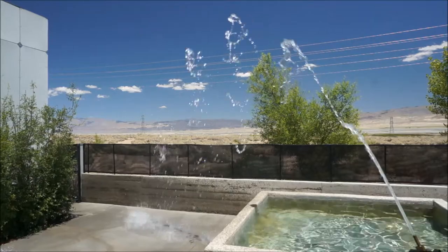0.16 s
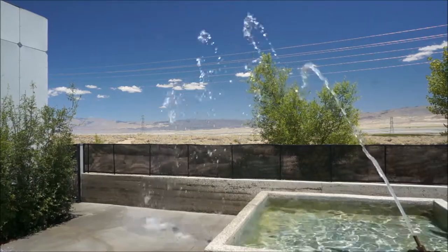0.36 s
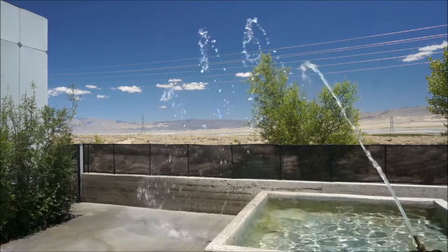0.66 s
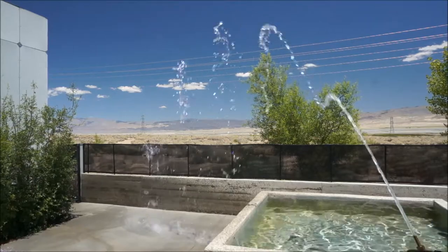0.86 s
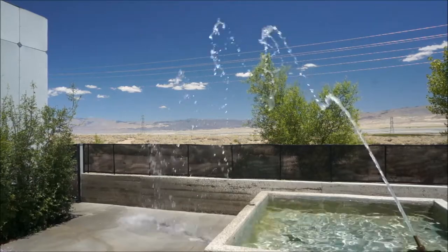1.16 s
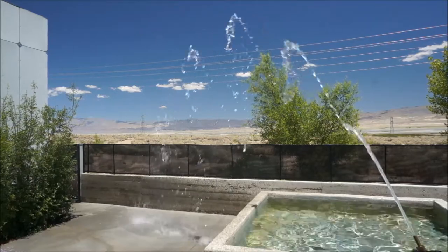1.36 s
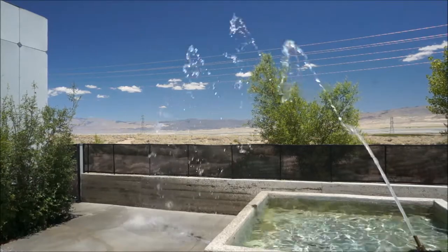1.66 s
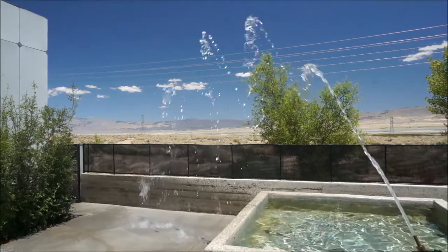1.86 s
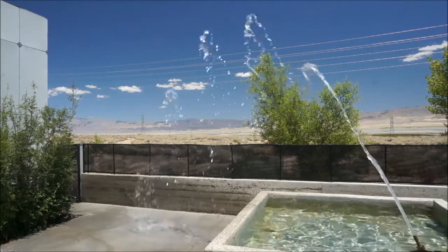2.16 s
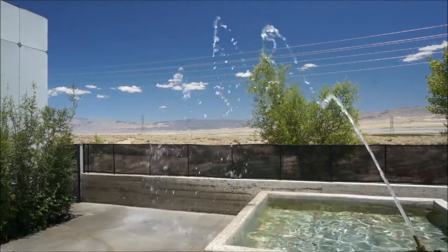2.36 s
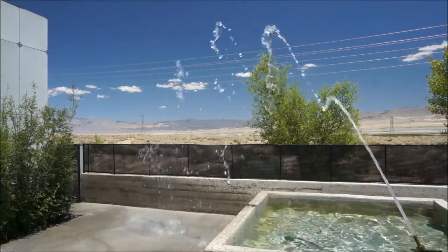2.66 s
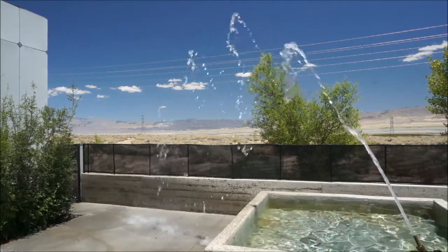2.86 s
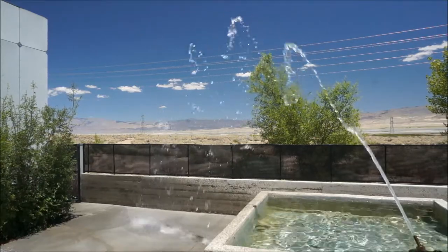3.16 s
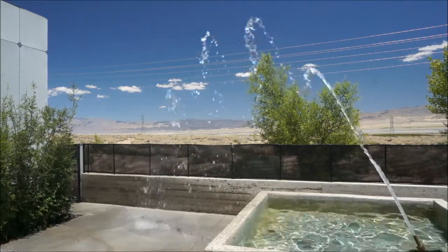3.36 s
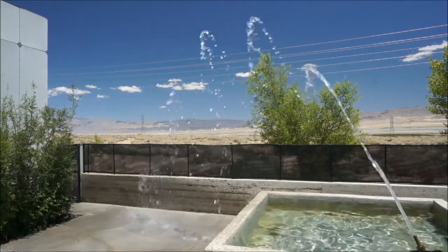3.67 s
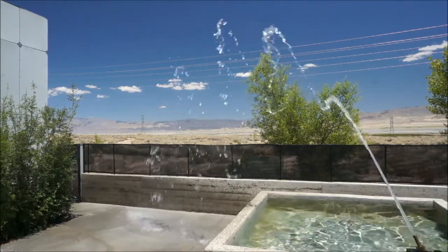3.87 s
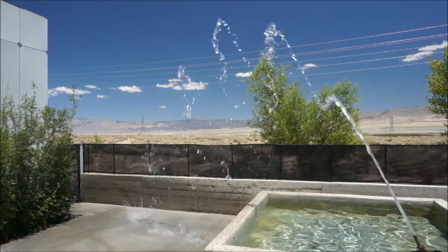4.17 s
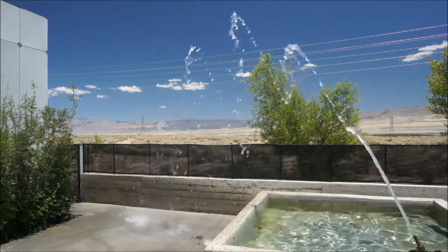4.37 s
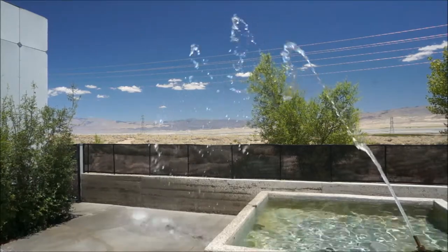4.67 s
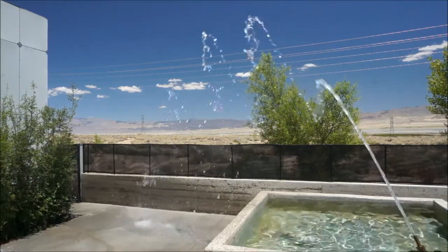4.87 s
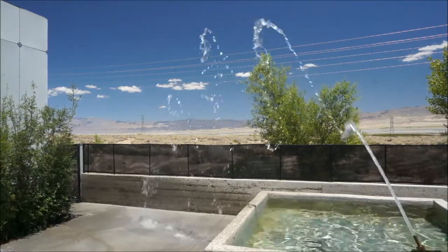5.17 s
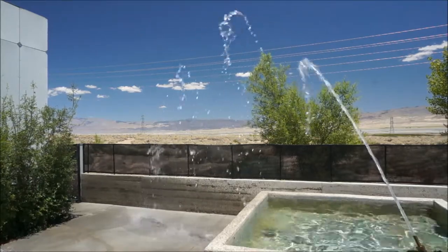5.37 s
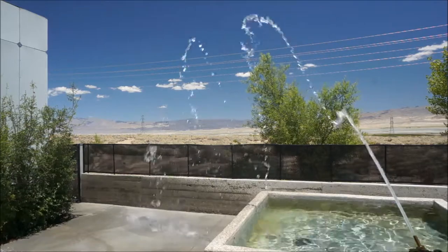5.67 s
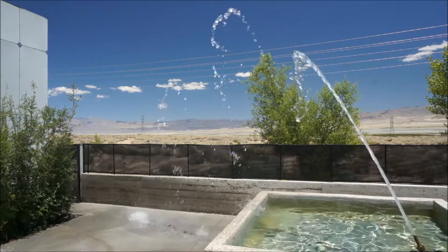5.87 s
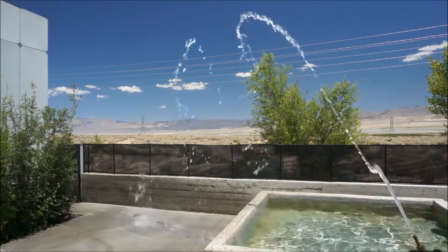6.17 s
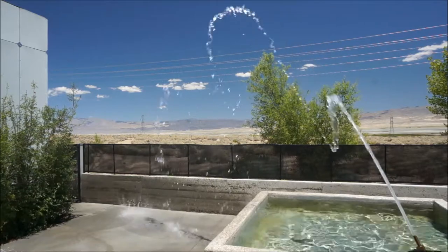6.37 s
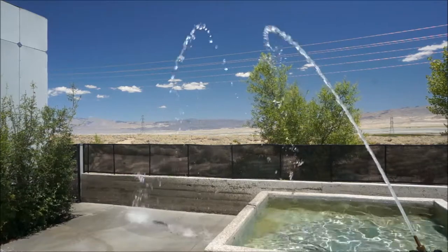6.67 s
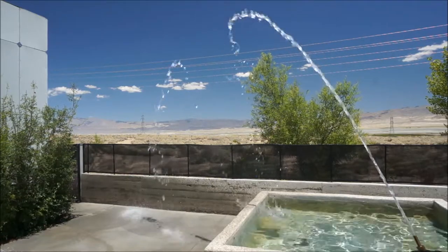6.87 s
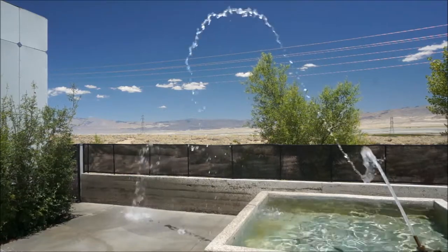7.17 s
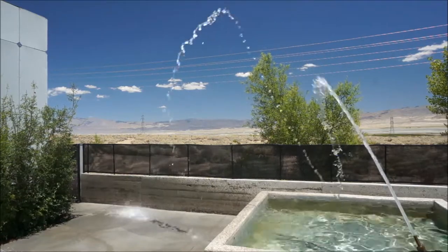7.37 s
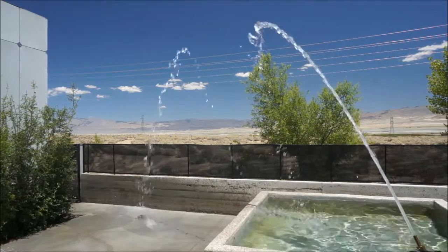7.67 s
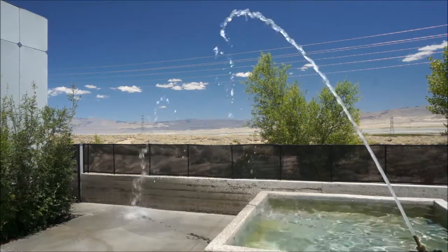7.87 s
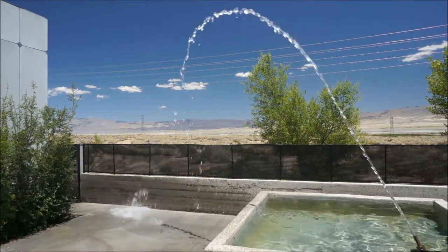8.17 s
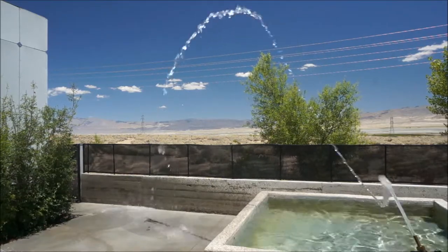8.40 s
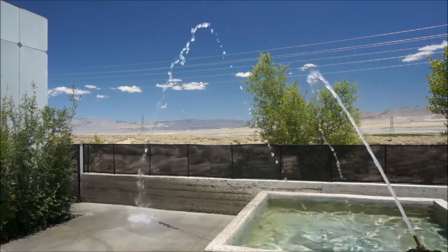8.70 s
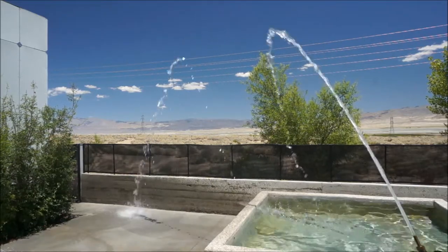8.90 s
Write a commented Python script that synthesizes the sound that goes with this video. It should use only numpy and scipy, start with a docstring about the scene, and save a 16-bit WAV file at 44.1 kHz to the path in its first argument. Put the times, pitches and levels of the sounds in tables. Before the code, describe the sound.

Water splatters on hard concrete in a steady, uneven rhythm: heavy gobs slap, drops patter sharply, fine spray hisses, and occasional bubbles plop in a pool. The pulses start short and frequent, then stretch into longer bursts separated by sparse dripping. Close, wide stereo in an open yard, the left side a little louder, with a brief noisy scatter from deck and wall and barely audible low wind.

```python
"""Fountain jets break up in the air and rain onto a wet concrete deck and a small pool, outdoors.
The water lands in uneven spurts over a drizzle: heavy gobs slap, drops patter, fine spray fizzes.
Slugs burst into clicks on concrete and ring bubbles in the pool; longer pours drum low and dull.
Every impact is a tiny damped wave; the deck and a low wall scatter most of them back as noisy echoes.
Behind the water lie one soft thump and a faint, lumpy rumble of breeze, made of filtered noise."""
import sys
import numpy as np
from scipy import signal
from scipy.fft import rfft, irfft
from scipy.io import wavfile
from scipy.ndimage import uniform_filter1d

SR = 44100
rng = np.random.default_rng(int(sys.argv[2]) if len(sys.argv) > 2 else 0)


def to_wav(sig):
    """Store sig (one row per channel, or 1-D mono) as 16-bit WAV at the path in sys.argv[1].

    Samples outside -1..1 are clipped; the rate is SR.
    """
    pcm = np.clip(np.atleast_2d(sig), -1, 1) * 32767
    pcm = np.round(pcm).astype(np.int16)
    wavfile.write(sys.argv[1], SR, pcm.T)  # frames by channels


N = 398650
TIME = np.arange(N) / SR

# tone colour of gobs, drops and spray: [f/Hz, level/dB]
GOB_COLOUR = [(40, -49), (120, -17), (200, -16), (300, -12), (450, -10.5), (750, -6.5), (1000, 1),
              (1400, 5.5), (4000, -26)]
DROP_COLOUR = [(100, -44.5), (300, -12), (800, -7), (1500, -1.5), (2000, -2), (2700, -0.5), (3600, -1.5),
               (5000, -1.5), (11000, -10)]
SPRAY_COLOUR = [(100, -39), (700, -1), (2500, 8), (4500, 1.5), (6000, 0), (7500, -1.5), (9500, -0.5),
                (11000, -1.5)]


def patter():
    """Smaller water sounds higher and denser; stray fat drops click on bare concrete."""
    gob_flow, drop_flow, spray_flow = landing()
    gobs = shower(gob_flow, low_hz=418, high_hz=1429, cycles=1.16,
                  spread_db=-0.5, clump_db=-0.5, count=7000, size=440)
    drops = shower(drop_flow, low_hz=1780, high_hz=4260, cycles=0.58,
                   spread_db=4.0, clump_db=0.46, count=30000, size=112)
    spray = shower(spray_flow, low_hz=4130, high_hz=11700, cycles=0.39,
                   spread_db=2.5, clump_db=1.05, count=80000, size=36)
    strays = shower(drop_flow, low_hz=1860, high_hz=5000, cycles=0.63,
                    spread_db=0.5, clump_db=3.5, count=1100, size=128)
    slaps = amp(-3.0) * coloured(gobs, GOB_COLOUR)
    clicks = coloured(amp(-1.0) * drops + amp(-10) * strays, DROP_COLOUR)
    fizz = coloured(spray, SPRAY_COLOUR)
    return slaps + clicks + fizz + drumming(gob_flow)


# the jets' spurts, about every .3 s and then in ever longer pours:
# [first landing t/s, hold/s, gob level/dB, drop level/dB]
SPURTS = [(0.116, 0.063, -35, -20), (0.477, 0.041, -31.5, -21.5), (0.763, 0.062, -33, -27.5),
          (1.06, 0.083, -29.5, -31), (1.363, 0.077, -30.5, -23.5), (1.683, 0.038, -30.5, -28),
          (1.974, 0.047, -42, -23.5), (2.27, 0.08, -37, -22), (2.587, 0.026, -47, -25),
          (2.836, 0.16, -45, -26), (3.16, 0.047, -34, -20.5), (3.486, .085, -31.5, -22.5),
          (3.751, 0.061, -31.5, -23), (4.044, .12, -34, -25), (4.283, 0.17, -34.5, -25.5),
          (4.673, 0.044, -31, -24.5), (4.966, .11, -34.5, -25), (5.277, .075, -33, -27),
          (5.537, 0.082, -31.5, -26), (5.978, 0.045, -30.5, -24), (6.114, 0.16, -36, -26),
          (6.425, 0.14, -33.5, -23), (6.668, 0.19, -34, -24.5), (7.055, 0.41, -35, -25.8),
          (7.891, .36, -30.5, -24.5), (8.814, 0.26, -32, -26)]
# the drizzle between spurts, thinning as the pauses grow: [t/s, gob level/dB, drop level/dB, spray level/dB]
DRIZZLE = [(0, -43, -28, -24.5), (1.4, -41, -28, -25.5), (2.07, -45, -29.5, -27), (2.5, -39, -27.5, -25.5),
           (3.2, -40, -28.5, -27), (3.65, -45, -38, -25), (4.2, -42.5, -27.5, -25), (5.2, -36, -24, -24.5),
           (5.5, -44, -28, -26), (5.8, -39.5, -25.5, -25), (6.4, -35, -30, -25.5), (6.86, -43, -28.5, -26),
           (6.929, -35.5, -35, -33), (7.15, -46, -31.5, -25), (7.4, -38.5, -28, -27),
           (7.55, -46, -34.5, -31.5), (7.85, -33, -25.5, -29), (8.05, -30, -24.5, -27.5),
           (8.27, -53, -39, -24.5), (8.35, -50, -34.5, -30.5), (8.6, -47.5, -36, -30),
           (9.04, -33, -33, -27.5)]
ATTACK_S, RELEASE_S = 0.0081, 0.028  # a spurt arrives at once and trails off
SPRAY_PER_DROP_DB = -9.5  # fine spray thrown up by a spurt, against its drops
GAP_DB, GAP_S = -2.5, 0.019  # dip just before a slug lands, deepest half of GAP_S ahead
UNEVEN_DB, UNEVEN_S = .5, .06  # how far and how quickly the drizzle wanders


def landing():
    """Flow of gobs, drops and spray: spurts add power to a drizzle that dips as slugs gather its water."""
    t = TIME[::32]  # coarse steps are enough for flow
    s, *levels = np.transpose(DRIZZLE)
    slug_s = np.array([row[0] for row in SPLASHES])
    ahead = np.maximum(slug_s[:, None] - t, 0) / GAP_S
    gap = (2 * ahead * np.exp(1 - 2 * ahead)).max(0)
    uneven = np.interp(t, TIME, wander(UNEVEN_S))
    change_db = GAP_DB * gap + UNEVEN_DB * uneven
    power = np.array([amp(np.interp(t, s, db) + change_db) ** 2 for db in levels])
    for start, hold, gobs_db, drops_db in SPURTS:
        attack = np.clip((t - start) / ATTACK_S + .5, 0, 1)
        release = np.exp(-np.maximum(t - start - hold, 0) / RELEASE_S)
        gains = amp([gobs_db, drops_db, drops_db + SPRAY_PER_DROP_DB])
        power += np.outer(gains, attack * release) ** 2
    return [np.interp(TIME, t, np.sqrt(p)) for p in power]


# drive of the drumming against the gob flow, as longer pours stay whole: [t/s, level/dB]
DRUMMING = [(5.3, -33.5), (6.1, -24.5), (8.1, -21.5), (9.04, -16)]


def drumming(gob_flow):
    """The unbroken stream beats low, dull blows under the gobs."""
    flow = gob_flow * amp(np.interp(TIME, *np.transpose(DRUMMING)))
    return shower(flow, low_hz=309, high_hz=610, cycles=1.4,
                  spread_db=2.0, clump_db=2.5, count=1800, size=1400)


# the largest slugs that land at once and burst: [t/s, relative level/dB, centre f/Hz, spread/s]
SPLASHES = [(0.215, -27.5, 4300, .032), (0.265, -28.5, 1470, .01), (.643, -30, 4500, .026),
            (0.778, -30.5, 2340, 0.022), (0.873, -25, 3940, 0.0099), (1.073, -26, 1790, 0.027),
            (1.222, -26, 2930, .023), (1.493, -22.5, 4380, 0.011), (1.568, -27.5, 3430, .031),
            (1.685, -24.5, 2740, .022), (1.865, -24.5, 4070, .032), (1.96, -28, 3400, 0.026),
            (2.211, -26, 4520, .027), (2.446, -26, 4800, .05), (2.672, -23.5, 3740, .029),
            (2.723, -25.5, 3070, 0.016), (3.292, -25, 4460, 0.062), (3.433, -23, 4440, 0.027),
            (3.69, -27, 4100, 0.031), (3.786, -23.5, 2870, 0.034), (4.28, -24, 1690, .018),
            (4.34, -23.5, 1600, .016), (4.399, -23.5, 1800, .012), (4.667, -26, 2780, 0.028),
            (4.804, -26, 3400, .016), (4.984, -24.5, 1700, 0.021), (5.045, -24.5, 1700, .02),
            (5.282, -28, 2540, 0.042), (6.453, -35, 2020, 0.045), (6.807, -28.5, 1920, .015),
            (6.978, -24.5, 3720, .016), (7.019, -24, 4650, .026), (7.067, -29.5, 1980, 0.051),
            (7.235, -28, 2010, 0.045), (7.35, -26.5, 2250, 0.031), (7.565, -26, 4700, .015),
            (7.634, -25, 4500, .025), (7.713, -22.5, 3500, .018), (7.816, -26.5, 4120, 0.0099),
            (7.906, -23.5, 2800, 0.017), (8.142, -23, 1590, .01), (8.379, -27.5, 4200, .029),
            (8.439, -27, 5330, .01), (8.474, -28.5, 6060, 0.031), (8.525, -25.5, 2670, 0.021),
            (8.606, -24.5, 3300, 0.015), (8.639, -24, 3060, 0.035), (8.708, -25.5, 3340, 0.012),
            (8.757, -24.5, 3250, .028), (8.903, -22.5, 2800, .016), (8.96, -24.5, 2350, .04)]
# two limits for lesser slugs landing by chance: [relative level/dB, centre f/Hz, spread/s]
SMALL_SPLASH = [(-31, 4100, .008), (-25.5, 6800, 0.03)]


def splashes():
    """Slugs burst on concrete into droplets that only click, over a wide range of pitches."""
    rows = np.vstack([SPLASHES, by_chance(SMALL_SPLASH, count=50)])
    return amp(1.42) * bursts(rows, octaves=0.52, cycles=0.49, spread_db=1.5,
                              front=0.12, front_s=.0025, count=230, size=144)


# the hardest single impacts: [t/s, relative level/dB, f/Hz]
PLOPS = [(.777, -13.5, 1320), (.792, -13, 1300), (1.077, -17, 730), (1.091, -19, 710), (1.685, -5.5, 4400),
         (1.741, -14, 2210), (2.058, -6, 4480), (2.537, -2, 4480), (2.851, -3.5, 5530), (2.879, -10, 2660),
         (4.297, -13.5, 1400), (4.343, -13, 1380), (4.364, -8, 4470), (4.407, -16, 1430),
         (5.318, -8.5, 1760), (6.284, -21, 500), (6.471, -20, 705), (6.879, -3.5, 3570), (7.6, -24, 550),
         (7.832, -11, 3510), (7.911, -6, 2170), (8.366, -5.5, 5350), (8.385, -8, 3620), (8.483, -8, 5530)]
# two limits for lesser ones landing by chance: [relative level/dB, f/Hz]
SMALL_PLOP = [(-12.5, 4900), (-11.5, 6070)]


def plops(swell_s=0.00018, rattle_s=0.000506, count=3):
    """The hardest single drops, from dull slaps to bright ticks; each breaks into a few quick blows."""
    rows = np.vstack([PLOPS, by_chance(SMALL_PLOP, count=60)])
    s, db, hz = np.repeat(rows, count, axis=0).T
    blow = np.tile(np.arange(count), len(rows)) - count // 2  # 0 is the main blow, weaker ones either side
    gap, pitch = rng.random((len(s), 2)).T
    s = s + blow * rattle_s * (.5 + gap)
    hz = hz * 2 ** (abs(blow) * (pitch - .75))
    cycles = np.maximum(swell_s * hz, .55)
    peak = amp(db - 9.3 * abs(blow) - 1.0 * np.log2(hz / 2000))  # higher blows are softer
    return amp(-2.5) * impacts(s, peak, hz, cycles, size=600)


# slugs that plunge and trap a cloud of bubbles: [t/s, relative level/dB, centre f/Hz, spread/s]
GULPS = [(.776, -28, 1530, 0.024), (1.075, -33, 840, 0.027), (1.742, -26, 1570, .018),
         (5.545, -34, 1235, 0.024), (6.283, -36, 513, 0.024), (6.460, -31, 950, 0.02),
         (6.810, -30.5, 1004, 0.023), (7.595, -33, 807, 0.032), (8.143, -32, 890, .01),
         (8.530, -34, 1580, .022)]


def gulps():
    """In the pool, bubbles of nearly one size ring for a few cycles."""
    return amp(4.0) * bursts(GULPS, octaves=0.16, cycles=1.5, spread_db=2.0,
                             front=0.14, front_s=.00299, count=30, size=900)


# two limits for single bubbles in the pool: [relative level/dB, f/Hz]
BUBBLES = [(-40, 1900), (-21, 9000)]


def bubbles(ring_s=0.0016, count=450):
    """Single trapped bubbles ring briefly, each on one pitch."""
    s, db, hz = by_chance(BUBBLES, count=count).T
    return impacts(s, amp(db), hz, ring_s * hz, size=700)


# one soft, low thump: (t/s, relative level/dB, f/Hz)
THUMP = (.2, -55, 166)


def thump():
    """A dull, low wave that dies within a few cycles."""
    s, db, hz = np.transpose([THUMP])
    return impacts(s, amp(db), hz, cycles=np.array([1.4]), size=4000)


# colour of the echoes, dulled by the bushes: [f/Hz, level/dB]
ECHO_COLOUR = [(60, -49), (200, -30), (450, -0.5), (1000, 2), (3000, 3.5), (5500, 1.5), (11000, 0)]


def yard(x, near_db=-15.0, wall_db=-10.0, size=256):
    """Diffuse echoes, unrelated in each ear: quick scatter off deck and pool rim, longer off the wall."""
    near_t60, wall_t60 = .06, .25  # seconds to fall by 60 dB
    power = abs(signal.stft(x.mean(0), nperseg=size)[2]) ** 2
    linger = 0
    for db, t60 in [(near_db, near_t60), (wall_db, wall_t60)]:
        keep = 10 ** (-3 * size / SR / t60)  # power dies frame by frame, in hops of size / 2
        tail = signal.lfilter([0, 1 - keep], [1, -keep], power, axis=1)
        linger = linger + amp(db) ** 2 * tail
    real, imag = rng.standard_normal((2, 2) + power.shape)
    echoes = signal.istft(np.sqrt(linger) * (real + 1j * imag), nperseg=size)[1]
    return coloured(echoes, ECHO_COLOUR)


# colour of the open air's low murmur: [f/Hz, level/dB]
AIR = [(15, -18), (60, -11), (130, 3), (250, -2), (600, -27), (2000, -60)]
# strength of the breeze: [t/s, level/dB]
BREEZE = [(0, -73), (.5, -82), (.7, -72), (1.1, -80), (1.9, -89), (3.5, -85), (5.8, -88), (8.6, -72),
          (9.04, -74.5)]
GUST_DB, GUST_S = 5.0, 0.081  # how far and how quickly it wanders


def air():
    """A faint, lumpy rumble of breeze: low filtered noise, almost the same on both sides."""
    noise = rng.standard_normal(N) + 0.21 * rng.standard_normal((2, N))
    rumble = evened(coloured(noise, AIR))
    strength_db = np.interp(TIME, *np.transpose(BREEZE)) + GUST_DB * wander(GUST_S)
    return rumble * amp(strength_db)


def shower(flow, low_hz, high_hz, cycles, spread_db, clump_db, count, size):
    """Random impacts of one size class: more water means more and harder hits, arriving in clumps."""
    when, chance, pitch, weight, ring = rng.random((count, 5)).T
    s = when * N / SR
    clumps = evened(uniform_filter1d(rng.standard_normal(N), size=400))
    local = np.interp(s, TIME, flow * amp(clump_db * clumps)) / np.percentile(flow, 95)
    share = np.minimum(local, 1)
    heft = amp(spread_db * np.minimum(-np.log(1 - weight), 4.2))  # exponential spread in dB, capped
    peak = (chance < share) * heft * local / np.sqrt(share)
    hz = low_hz * (high_hz / low_hz) ** pitch
    rain = impacts(s, peak * np.sqrt(hz / low_hz), hz, cycles * 2 ** (2 * ring - 1), size=size)
    return evened(rain) * np.sqrt(np.mean(flow ** 2))


def bursts(rows, octaves, cycles, spread_db, front, front_s, count, size):
    """Each slug's front smacks down at once; a crowd of small impacts follows and thins out."""
    s, db, hz, duration = np.repeat(rows, count, axis=0).T
    wait, pitch = rng.standard_normal((len(s), 2)).T
    order, weight = rng.random((len(s), 2)).T
    delay = abs(wait) % 2 * np.where(order < front, front_s, duration)
    hz = np.clip(hz * 2 ** (octaves * pitch), 420, 13000)
    heft = evened(amp(spread_db * np.minimum(-np.log(1 - weight), 3.5)))
    peak = amp(db) * heft * np.sqrt(hz * duration / (count * cycles))  # the impacts share the slug's energy
    return impacts(s + delay, peak, hz, np.full(len(s), cycles), size=size)


def impacts(s, peak, hz, cycles, lead=0.0029, scatter=0.0067, pan_db=-1.2, size=96):
    """Each impact is a wave that swells for some cycles and dies; each lands in its own direction."""
    phase, pan, angle = rng.standard_normal((len(s), 3)).T[:, :, None]
    at = (s * SR).astype(int)[:, None] + np.arange(size)
    turns = (np.maximum(at / SR - s[:, None], 0) * hz[:, None]).astype(np.float32)
    u = turns / cycles[:, None].astype(np.float32)
    swell = u * np.exp(1 - u)
    out = []
    for side in (1, -1):
        shift = phase + side * (lead + scatter * angle)  # phase lead of one side; lead and scatter in cycles
        tone = np.sin(2 * np.pi * (turns + shift.astype(np.float32)))
        wave = swell * tone * (peak[:, None] * amp(side * pan_db * pan))
        out.append(np.bincount(np.clip(at, 0, N).ravel(), wave.ravel(), N + 1)[:N])
    return np.array(out)


def by_chance(limits, count):
    """Events at random times, each value between its limits; they weaken as the drizzle thins."""
    low, high = np.array(limits, float)
    draw = rng.random((count, 1 + len(low)))
    s = (np.arange(count) + draw[:, 0]) / count * N / SR  # one in each equal slot
    rows = np.column_stack([s, low + (high - low) * draw[:, 1:]])
    when, _, drops_db, _ = np.transpose(DRIZZLE)
    rows[:, 1] += np.minimum(np.interp(s, when, drops_db) - np.median(drops_db), 0)
    return rows


def wander(length_s):
    """Slow chance with an rms of 1, changing about once in the given time."""
    knots = np.cumsum(length_s * (.5 + rng.random(600))) - length_s
    return evened(np.interp(TIME, knots, rng.standard_normal(600)))


def amp(db):
    """Decibels to gain."""
    return 10 ** (np.asarray(db) / 20)


def evened(x):
    """Scaled to an rms of 1."""
    return x / np.sqrt(np.mean(x ** 2) + 1e-20)


def read(points, hz):
    """A spectrum joined by straight lines on a log-frequency axis."""
    f, value = np.transpose(points)
    return np.interp(np.log(hz + 1), np.log(f + 1), value)


def coloured(x, points, size=4096):
    """Causal minimum-phase filter with the given gain curve, so that attacks stay sharp."""
    log_gain = np.log(amp(read(points, abs(np.fft.fftfreq(size, 1 / SR)))))
    response = np.exp(np.conj(signal.hilbert(log_gain)))
    taps = np.fft.ifft(response).real[:size // 2]
    return signal.oaconvolve(x, taps[None], axes=1)[:, :N]


# shared colour of plops, splashes and gulps: [f/Hz, level/dB]
HIT_COLOUR = [(40, -53), (100, -46), (200, -24), (400, -5), (750, -3.5), (1000, 2), (1450, 1), (2400, 2.5),
              (5000, 0), (7500, 2.5), (11000, 5.5)]


def scene():
    """Water landing on deck and pool, its echoes, the open air and one thump."""
    water = patter() + bubbles() + coloured(plops() + splashes() + gulps(), HIT_COLOUR)
    return water + yard(water) + air() + thump()


# left minus right at the microphone: [f/Hz, level difference/dB]
BALANCE_DB = [(150, -1), (600, 1), (1100, 3), (1700, 4), (2800, 2), (5000, 2.5), (8000, 1), (11000, 0.3)]
EDGE_HZ = 11080  # upper band limit


def record(dry, ceiling=0.59):
    """The left side hears more of the deck; the tallest peaks are rounded off; then the band limit."""
    tilt = read(BALANCE_DB, np.fft.rfftfreq(N, 1 / SR))
    heard = irfft(rfft(dry) * amp(np.array([tilt, -tilt]) / 2), N)
    heard = heard / (1 + (heard / ceiling) ** 6) ** (1 / 6)
    band_limit = signal.firwin(1023, EDGE_HZ, window=("kaiser", 8), fs=SR)
    return signal.oaconvolve(heard, band_limit[None], "same")


dry = scene()
out = record(dry)
to_wav(out)
```